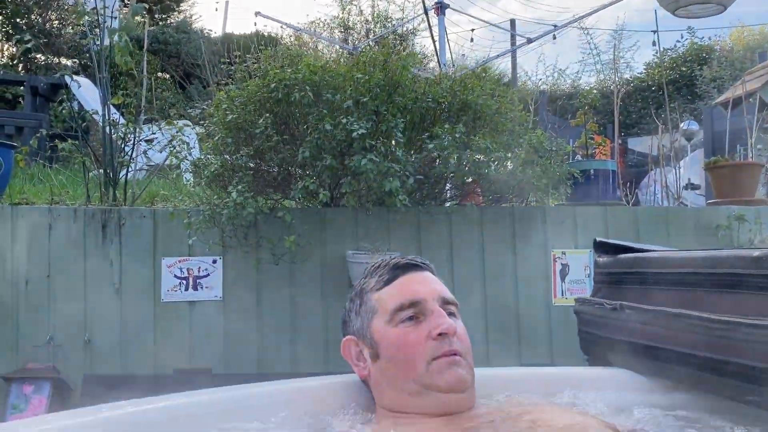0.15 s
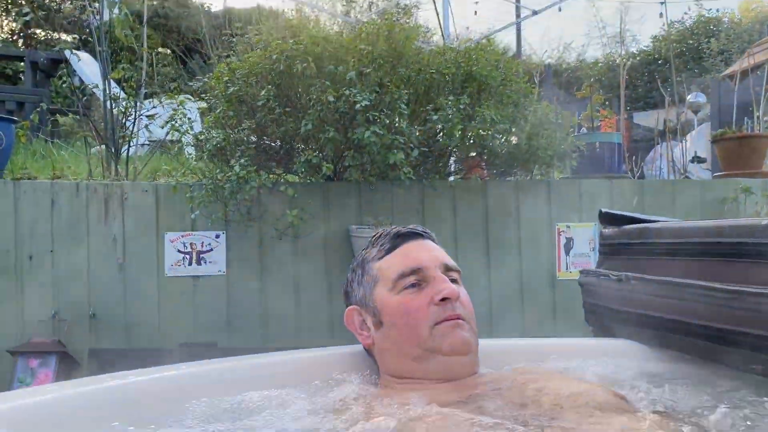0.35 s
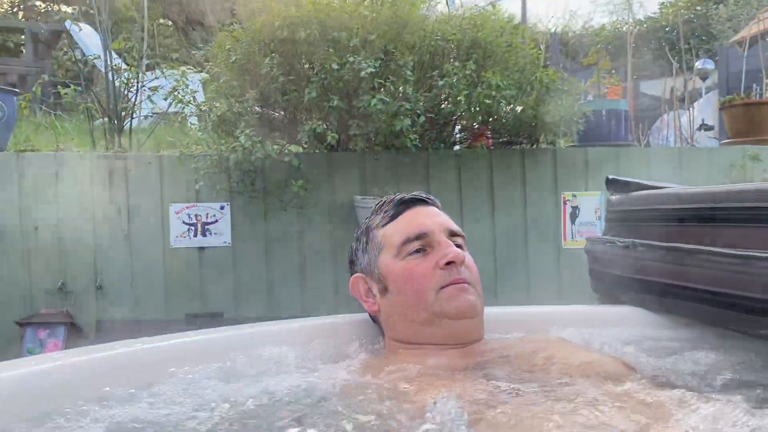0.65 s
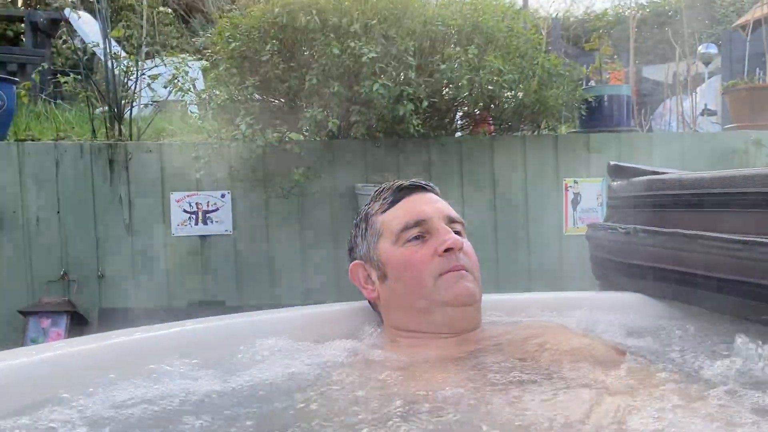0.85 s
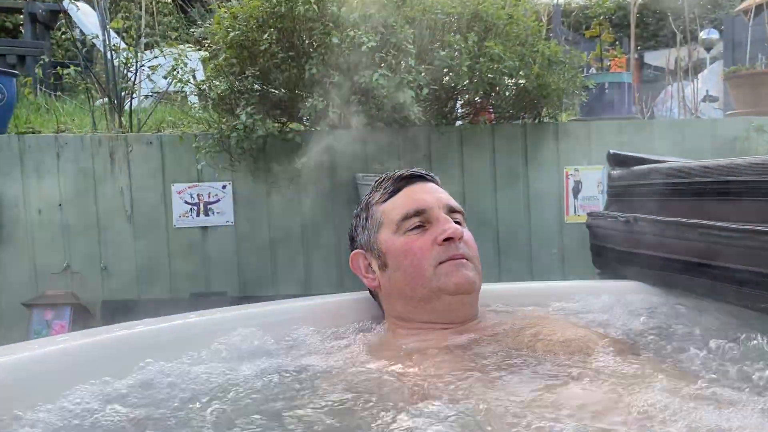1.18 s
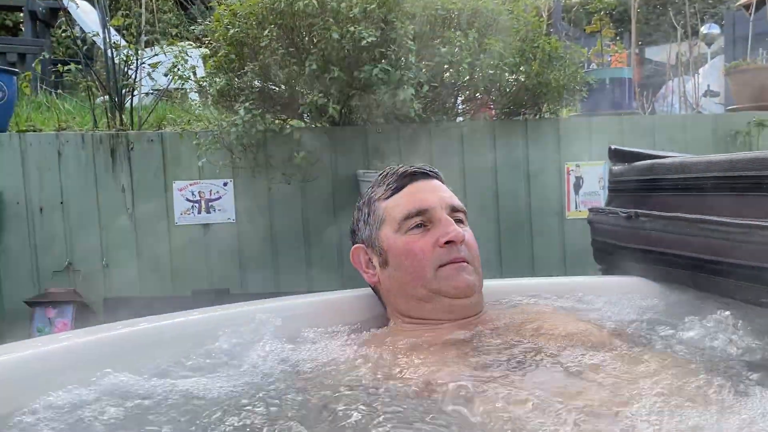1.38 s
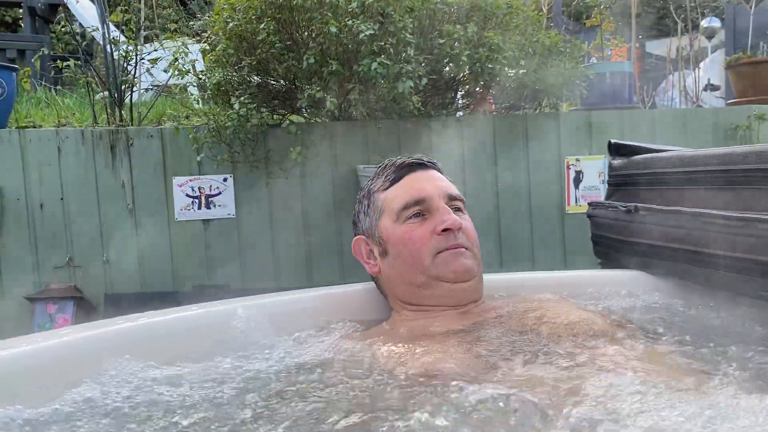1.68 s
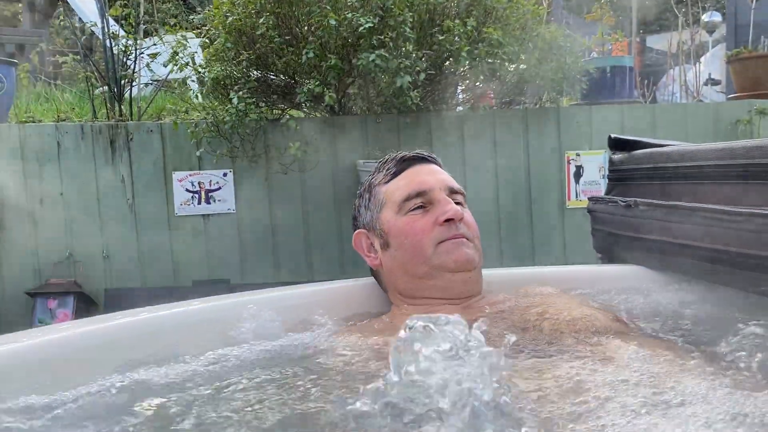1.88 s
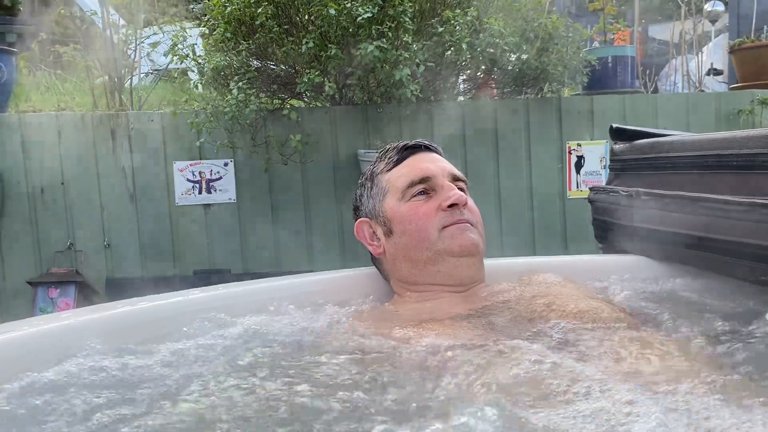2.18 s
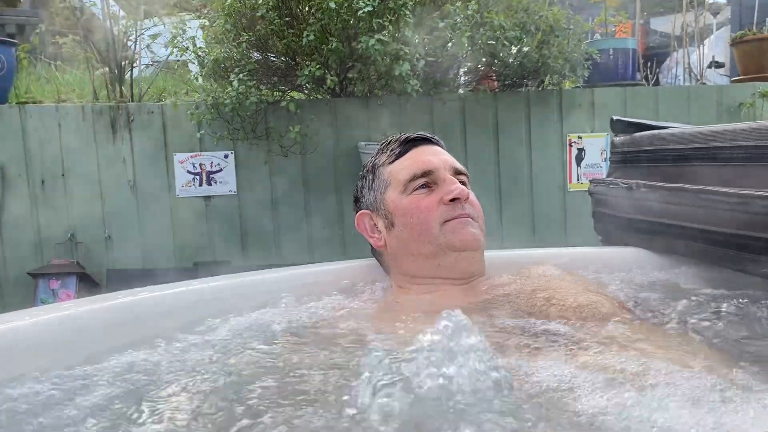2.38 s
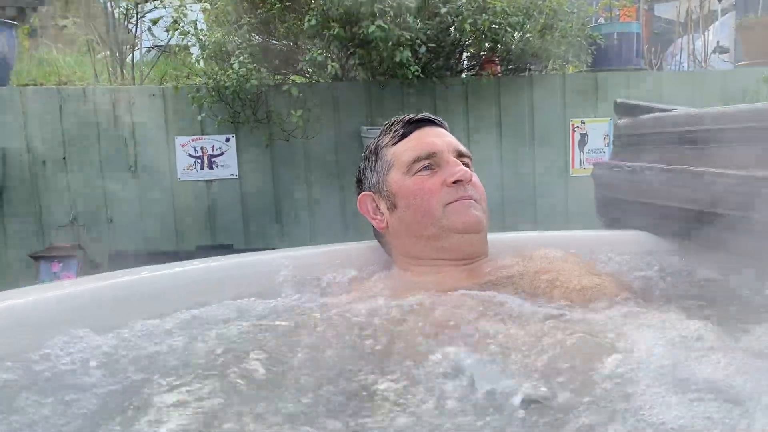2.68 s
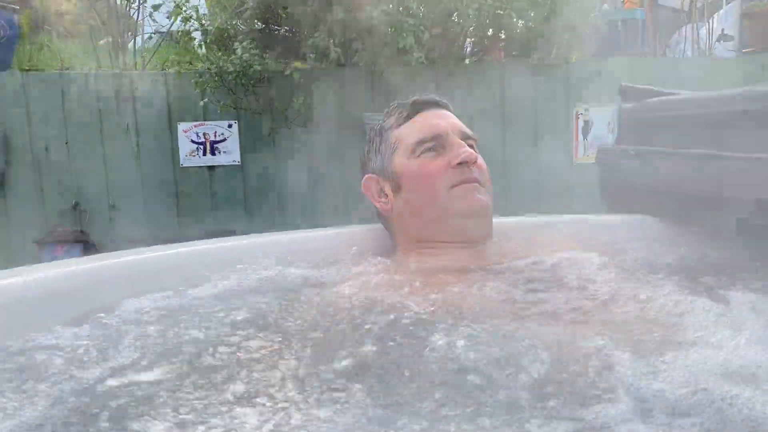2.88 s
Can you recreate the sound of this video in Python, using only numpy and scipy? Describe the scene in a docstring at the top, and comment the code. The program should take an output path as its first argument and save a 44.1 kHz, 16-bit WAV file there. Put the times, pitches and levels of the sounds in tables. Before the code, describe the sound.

Hot tub jets churn water continuously for about three seconds, close and outdoors in stereo. A steady, low-weighted rush carries dense bubbling, fizzing and brief spray. Hollow glugs cluster in the first half second, then return near 0.9, 1.45, 1.7, 1.9 and faintly 2.5. A deep surge swells around 1.6, strong plops follow near 2.0, and bright pops scatter throughout. A low pump hum stays faint beneath.

```python
"""Churning hot tub

Jets churn the water of an outdoor hot tub, heard close above the surface by two microphone ports.
Band noise makes the rush, the deep rumble and the gated bursts of spray. Rising, dying sines make
the bubbles: random crowds of five sizes, and single clear pops with small fellows.
Steady-pitch sines make the glugs of large air pockets; wavering tones make the pump hum below."""
import sys
import numpy as np
from scipy import signal
from scipy.fft import rfft, irfft
from scipy.io import wavfile

SR = 44100
rng = np.random.default_rng(int(sys.argv[2]) if len(sys.argv) > 2 else 0)


def generate_wav(signal):
    """Clip the signal to [-1, 1] and save it as 16-bit WAV at the path in sys.argv[1]."""
    frames = np.transpose(np.atleast_2d(signal))
    scaled = np.clip(frames, -1, 1) * 32767
    pcm = np.round(scaled).astype(np.int16)
    wavfile.write(sys.argv[1], SR, pcm)


def how_loud(loudness_db):
    """Turn decibels into a plain amplitude multiplier (0 dB gives 1, 20 dB gives 10)."""
    steps = np.asarray(loudness_db, float) / 20
    return 10 ** steps


N = 134505

# Pump tones: f/Hz, level/dB rms before waver
PUMP_TONES = [(99.7, -34.5), (300, -51), (415, -41.5)]
# Deep surges, before the water gain: t/s, level/dB
RUMBLE_LEVEL = [(0, -39), (.9, -42), (1.25, -43.5), (1.45, -38), (1.63, -27.5), (1.75, -37), (2.2, -39.5),
                (3.05, -39)]
# Relative spectrum of the rush: f/Hz, density/dB per Hz
RUSH_SPECTRUM = [(25, -53), (50, -18.5), (85, -3.5), (135, -3.5), (200, -0.5), (300, -5.5), (500, -9),
                 (1000, -18), (2000, -24.5), (3000, -25), (4500, -30.5), (6000, -29), (8000, -40.5),
                 (10000, -35.5), (16000, -38)]
# Spray bursts, before the water gain: t/s, level/dB before decay, length/s
SPRAY_BURSTS = [(.165, -32, 0.013), (.328, -34, 0.0096), (.383, -30, 0.011), (1.149, -36, .003),
                (1.926, -29, 0.0055), (1.981, -35, 0.017), (2.028, -34.5, .02), (2.458, -30, 0.006)]
# Random bubbles by size, before the water gain: rate/(1/s) per side before clumping, lowest f/Hz,
# highest f/Hz, ring/cycles, size spread/dB, level/dB rms before surge
BUBBLE_SIZES = [(91.6, 170, 480, 25, 4, -32.5), (259, 457, 1282, 29, 2, -39),
                (798, 1314, 3250, 18, 1.5, -47), (477, 4160, 9200, 50, -1.5, -53.5),
                (820, 4400, 15200, 4, 0.5, -54)]
# Passing surge of one bubble size, keyed by row of BUBBLE_SIZES: t/s, width/s, gain/dB
BUBBLE_SURGES = {1: (2.65, 0.45, 3.5), 2: (1.73, 0.24, 6.5)}
# Large air pockets breaking the surface: t/s, peak level/dB, f/Hz
AIR_POCKETS = [(.205, -22.5, 217), (0.364, -22.5, 210), (0.467, -22, 196), (0.573, -31, 196),
               (0.863, -21, 192), (1.45, -19.5, 194.6), (1.696, -21.5, 273), (1.875, -23, 198),
               (2.49, -29.5, 184)]
# Clearest single bubbles: t/s, peak level/dB before pan, starting f/Hz, ring/cycles, left minus right/dB
CLEAR_BUBBLES = [(0.045, -27, 1820, 25, 7), (.049, -20.5, 870, 20, -5), (0.195, -28, 5900, 25, 8),
                 (.3335, -21, 1614, 18, 3), (.334, -24.5, 1045, 30, 6), (0.34, -22, 1580, 42, 4),
                 (.388, -30.5, 5940, 15, 6), (0.796, -30.5, 6600, 190, 3), (.808, -27, 2170, 37, 8),
                 (.982, -33, 6540, 130, 1), (1.051, -28, 1570, 33, 0.1), (1.093, -29, 3650, 47, 4),
                 (1.150, -19.5, 12900, 12, 1), (1.191, -34, 7050, 140, 5), (1.3252, -20, 6500, 4.5, -4),
                 (1.566, -22.5, 9500, 10, -1), (1.597, -24, 6660, 11, 2), (1.924, -26, 5800, 12, -3),
                 (2.005, -16, 900, 7.3, 2), (2.031, -20, 1970, 16, 6), (2.043, -27, 1500, 22, 3),
                 (2.154, -26, 2300, 14, -7), (2.31, -15.5, 10900, 6.3, -2), (2.378, -20, 820, 45, -6),
                 (2.572, -22, 6400, 12, -3), (2.631, -30.5, 7100, 160, 1), (2.650, -29, 3580, 60, 3),
                 (2.803, -32.5, 7000, 200, 4), (2.823, -26, 4600, 31, 8)]
# Port pair: f/Hz, likeness of the water/0-1, right lead/rad
PORT_PAIR = [(90, .86, .1), (200, .8, .25), (450, .5, .9), (700, .32, 1.3),(1200, .15, .7), (1800, .05, .6),
             (2300, .22, -.1), (2800, .48, -.7), (3300, .3, -.9), (4100, .42, -.2), (4900, .2, -.5),
             (5600, .05, .5), (6300, .5, -.2), (6900, .85, 0), (8200, .99, 0)]
# Port balance: f/Hz, left minus right/dB
PORT_TILT = [(100, -1), (1000, 0), (2500, -0.5), (4800, 2), (6500, 0.2)]

HUM_WAVER_DB = 2
RUMBLE_LOW_HZ, RUMBLE_HIGH_HZ = 49, 94.4
RUSH_DB = -28.5  # before the water gain
OWN_FLICKER_HALVED_HZ = 5200  # a band's own flicker shrinks with pitch, to half here
SPRAY_LOW_HZ, SPRAY_HIGH_HZ = 1500, 9100
SMALL_SPRAYS_PER_S, SMALL_SPRAY_MIN_DB, SMALL_SPRAY_S = 16, -48, 0.0063
SWELL = 0.0059  # attack lasts one cycle plus this share of the ring
PHASE_RISE = 0.094  # extra phase share at ring end; pitch gains twice this
GLUG_CYCLES = 17.4
FELLOW_DB, FELLOW_OCTAVES, FELLOW_S = -12, 0.76, 0.015  # relative level, largest shift, longest delay
WATER_GAIN = np.sqrt(2)
TREBLE_LAG_S, LAG_FROM_HZ = .000237, 6950  # above this the left lags further
MIC_LOW_HZ, TOP_HZ = 36.2, 15750


def rms_one(x):
    """Scale to unit rms."""
    return x / np.sqrt(np.mean(x ** 2) + 1e-20)


def in_time(rows):
    """Interpolate a table of t/s, value at every sample."""
    s, value = np.transpose(rows)
    return np.interp(np.arange(N) / SR, s, value)


def at_hz(points, hz, order=1):
    """Interpolate column `order` of a table on a log-frequency axis."""
    points = np.array(points)
    return np.interp(np.log(hz + 1), np.log(points[:, 0]), points[:, order])


def drift(rate_hz):
    """Slow random curve of unit rms: noise through two equal poles at rate_hz, run at SR / 40."""
    r = np.exp(-80 * np.pi * rate_hz / SR)
    noise = rng.standard_normal(N // 40 + 2002)
    slow = signal.lfilter([1], [1, -2 * r, r * r], noise)[2000:]
    return np.interp(np.arange(N) / 40, np.arange(len(slow)), rms_one(slow - slow.mean()))


def band_noise(order, low_hz, high_hz):
    """Two unrelated streams of band noise, unit rms."""
    sos = signal.butter(order, [low_hz, high_hz], "band", fs=SR, output="sos")
    return rms_one(signal.sosfilt(sos, rng.standard_normal((2, N))))


def blip(hz, cycles):
    """One bubble: a dying sine that rises in pitch; 60 dB down after `cycles`."""
    turn = np.arange(int(cycles / hz * SR) + 2) * hz / SR
    tone = np.sin(2 * np.pi * turn * (1 + PHASE_RISE * turn / cycles))
    attack = np.minimum(turn / (1 + SWELL * cycles), 1)
    return tone * how_loud(-60 * turn / cycles) * attack


def pump():
    """Motor hum: sines at fixed pitches whose levels waver separately."""
    t = np.arange(N) / SR
    hum = 0
    for hz, db in PUMP_TONES:
        level = np.sqrt(2) * how_loud(db + HUM_WAVER_DB * drift(1.8))
        hum = hum + level * np.sin(2 * np.pi * (hz * t + rng.random()))
    return hum


def rumble():
    """Deep surges of water: low band noise under a level curve."""
    return how_loud(in_time(RUMBLE_LEVEL)) * band_noise(2, RUMBLE_LOW_HZ, RUMBLE_HIGH_HZ)


def rush(shared_db, own_db, fast_db):
    """Two unrelated streams of turbulent noise in half-octave bands that flicker alike."""
    out, together = 0, drift(2.7)
    edges = 22 * 2 ** np.arange(0, 9.7, .5)
    white = rng.standard_normal((2, 2, N))
    for k, (low, high) in enumerate(zip(edges, edges[1:])):
        sos = signal.butter(2, [low, high], "band", fs=SR, output="sos")
        band = signal.sosfilt(sos, white[k % 2])  # neighbours use different noise
        own = own_db * drift(16.0) / (1 + low / OWN_FLICKER_HALVED_HZ)
        flicker_db = shared_db * together + own + fast_db * drift(18.6)
        out = out + band * how_loud(at_hz(RUSH_SPECTRUM, np.sqrt(low * high)) + flicker_db)
    return rms_one(out)


def sprays():
    """Spray thrown up: broad noise under short dying gates, listed bursts and many small ones."""
    gate, small = np.zeros(N + SR), rng.random((60, 2))
    rows = list(SPRAY_BURSTS)
    for u, v in small:
        s = 60 / SMALL_SPRAYS_PER_S * u
        if s < N / SR:
            rows.append((s, SMALL_SPRAY_MIN_DB + 8 * v, SMALL_SPRAY_S))
    for s, db, length_s in rows:
        t = np.arange(int(3 * length_s * SR)) / SR / length_s  # in lengths
        start = int(s * SR)
        gate[start:start + len(t)] += how_loud(db) * np.minimum(8 * t, 1) * np.exp(-2 * t)
    return gate[:N] * band_noise(1, SPRAY_LOW_HZ, SPRAY_HIGH_HZ)


def bubbles(clump_db):
    """Bubbles burst at random in clumps, drawn separately for two streams."""
    out, t = np.zeros((2, N)), np.arange(N) / SR
    for row, (rate, low_hz, high_hz, cycles, spread_db, level_db) in enumerate(BUBBLE_SIZES):
        born = rng.random((2, N)) < rate * how_loud(clump_db * drift(8)) / SR
        size_db = spread_db * np.minimum(rng.exponential(1, (2, N)), 3)
        hits = born * how_loud(size_db) * rng.choice([-1, 1], (2, N))
        pitch_index = rng.integers(0, 12, N)
        rings = 0
        for k, hz in enumerate(np.geomspace(low_hz, high_hz, 12)):
            shape = blip(hz, cycles)[None]
            rings = rings + signal.oaconvolve(hits * (pitch_index == k), shape)[:, :N]
        s, width_s, surge_db = BUBBLE_SURGES.get(row, (0, 1, 0))
        surge = surge_db * np.exp(-((t - s) / width_s) ** 2)
        out += how_loud(level_db + surge) * rms_one(rings)
    return out


def glugs():
    """Each air pocket swells for a few cycles and rings out at a steady pitch."""
    out = np.zeros(N + SR)
    for s, db, hz in AIR_POCKETS:
        turn = np.arange(int(GLUG_CYCLES / hz * SR)) * hz / SR
        tone = np.sin(2 * np.pi * (turn + rng.random()))
        shape = tone * turn * how_loud(-60 * turn / GLUG_CYCLES)
        start = int(s * SR)
        out[start:start + len(shape)] += how_loud(db) * shape / np.abs(shape).max()
    return out[:N]


def pops():
    """Listed bubbles, panned by level; three quieter fellows ring at or after each."""
    out = np.zeros((2, N + SR))
    chance = rng.uniform(-1, 1, (len(CLEAR_BUBBLES), 3, 3))
    for (s, db, hz, cycles, pan_db), draws in zip(CLEAR_BUBBLES, chance):
        group = [(s, db, hz, pan_db)]
        for u, v, w in draws:
            delay_s = FELLOW_S * abs(u) * min(1, 2000 / hz)
            fellow_hz = min(hz * 2 ** (FELLOW_OCTAVES * v), 15000)
            group.append((s + delay_s, db + FELLOW_DB, fellow_hz, pan_db + 4 * w))
        for start_s, level_db, pitch_hz, side_db in group:
            shape = blip(pitch_hz, cycles)
            gain = how_loud(level_db + side_db / 2 * np.array([[1], [-1]]))
            start = int(start_s * SR)
            out[:, start:start + len(shape)] += gain * shape / np.abs(shape).max()
    return out[:, :N]


def ports(shared, apart):
    """Mix two unrelated streams to the likeness, add the shared sound, then shift phase and tilt."""
    hz = np.arange(N // 2 + 1) * SR / N
    alike = np.clip(at_hz(PORT_PAIR, hz), 0, 1)
    lag = 2 * np.pi * TREBLE_LAG_S * np.maximum(hz - LAG_FROM_HZ, 0)
    lead = at_hz(PORT_PAIR, hz, order=2) + lag
    mid = np.sqrt((1 + alike) / 2) * rfft(apart[0])
    side = np.sqrt((1 - alike) / 2) * rfft(apart[1])
    pair = rfft(shared) + mid + side * [[1], [-1]]
    shift = np.exp(.5j * lead * [[-1], [1]])
    tilt = how_loud(at_hz(PORT_TILT, hz) / 2 * [[1], [-1]])
    return irfft(pair * shift * tilt, N)


def scene():
    """Water, bubbles and pump at the ports."""
    water = how_loud(RUSH_DB) * rush(shared_db=0.62, own_db=1.1, fast_db=1.21)
    water = water + bubbles(clump_db=3.0) + rumble() + sprays()
    return ports(pops() + glugs() + pump(), WATER_GAIN * water)


def top_cut(x):
    """Nothing passes above the cut-off."""
    return signal.sosfilt(signal.butter(12, 15890, fs=SR, output="sos"), x)


def record(dry):
    """The microphone cuts the deepest bass; a separate steep low-pass removes the very top."""
    mic_cut = signal.butter(3, MIC_LOW_HZ, "high", fs=SR, output="sos")
    steep_low_pass = signal.ellip(12, .3, 60, TOP_HZ, fs=SR, output="sos")
    mix = signal.sosfilt(np.vstack([mic_cut, steep_low_pass]), dry)
    return top_cut(mix)


dry = scene()
out = record(dry)
generate_wav(out)
```